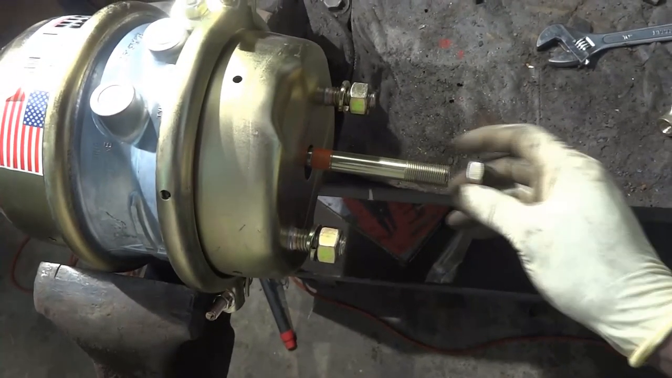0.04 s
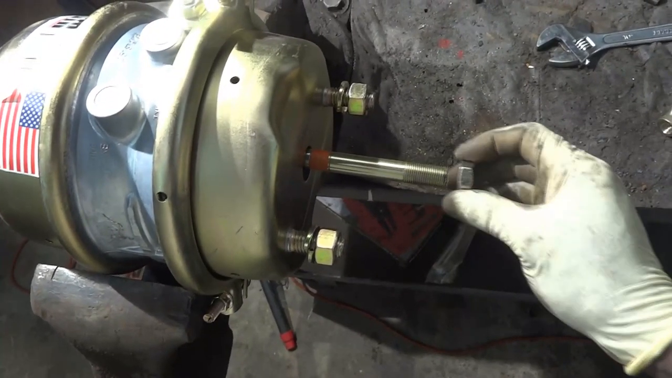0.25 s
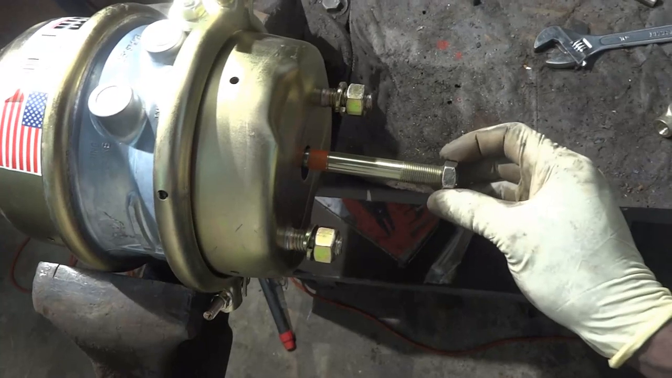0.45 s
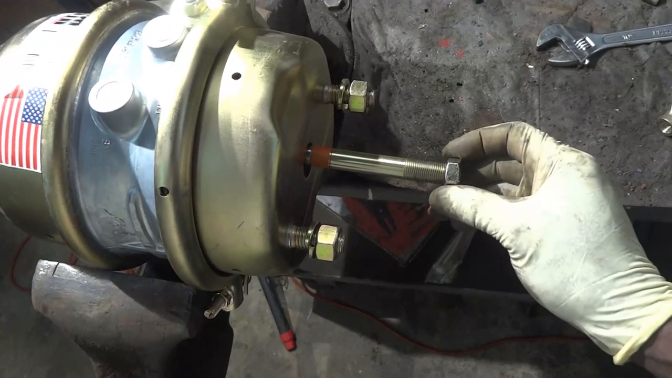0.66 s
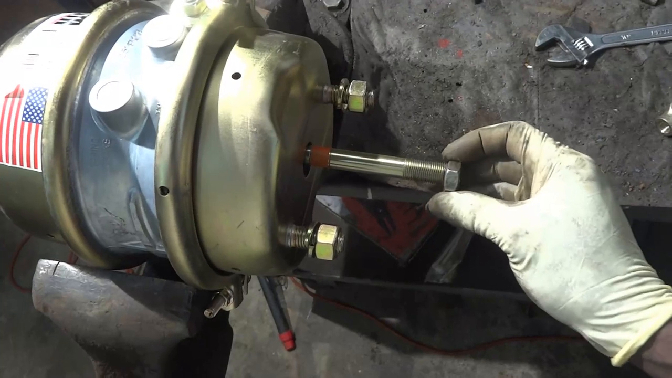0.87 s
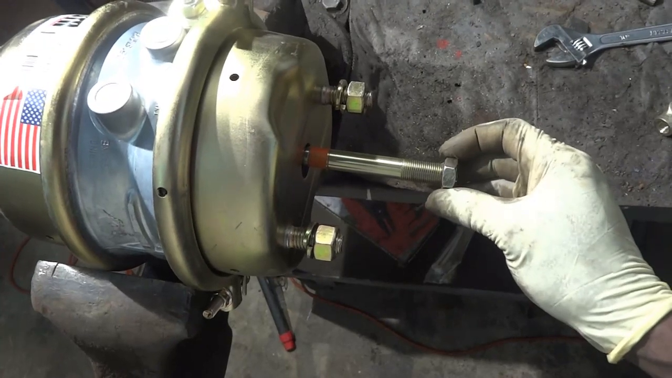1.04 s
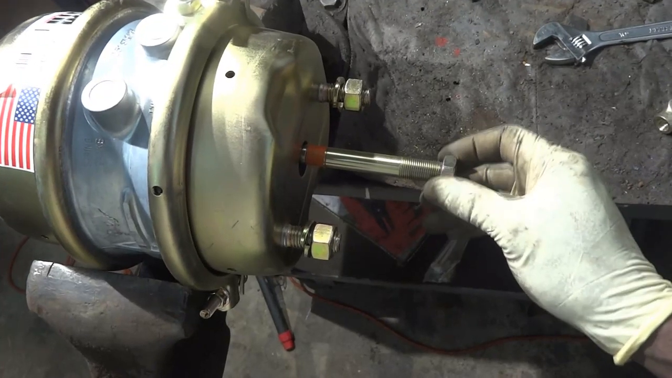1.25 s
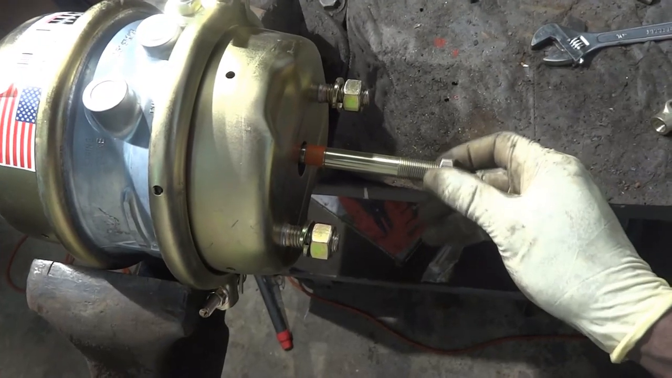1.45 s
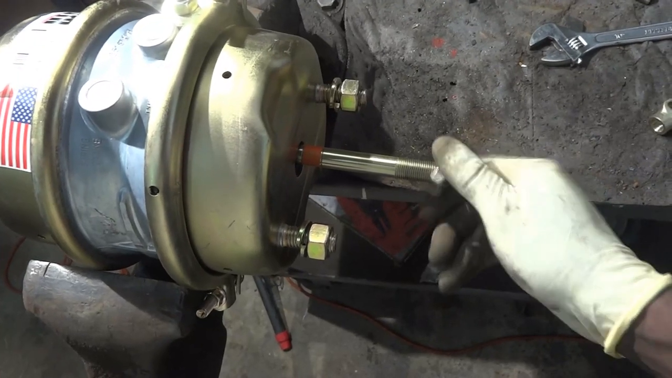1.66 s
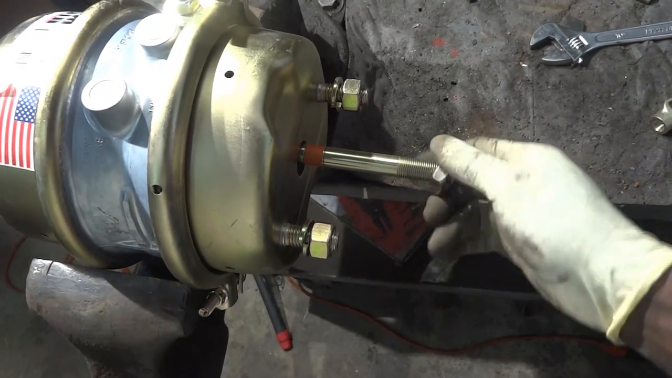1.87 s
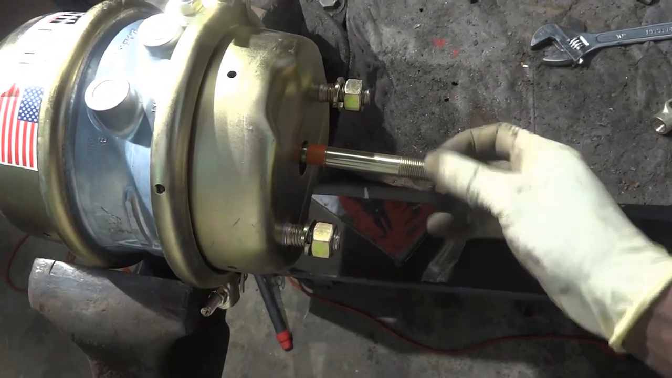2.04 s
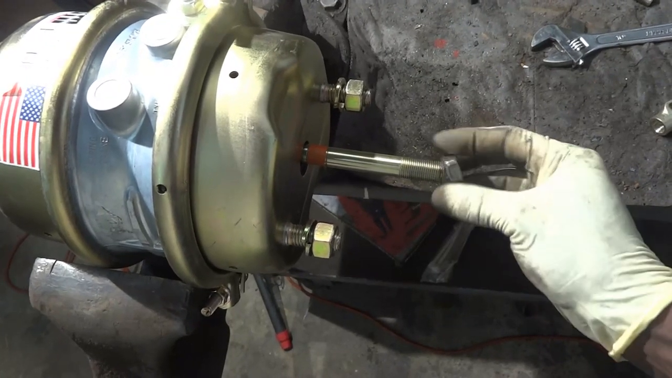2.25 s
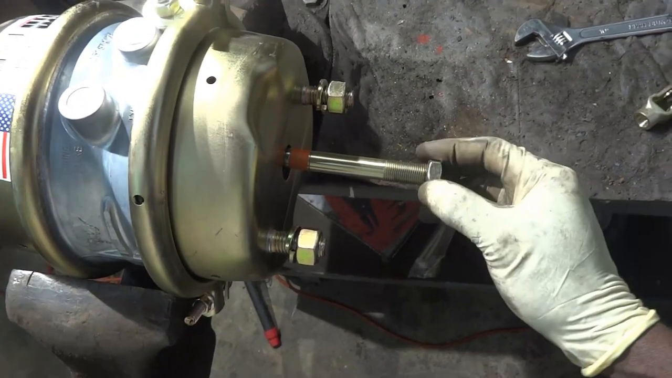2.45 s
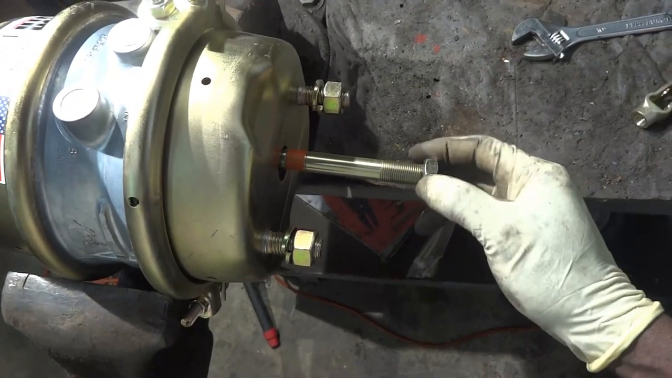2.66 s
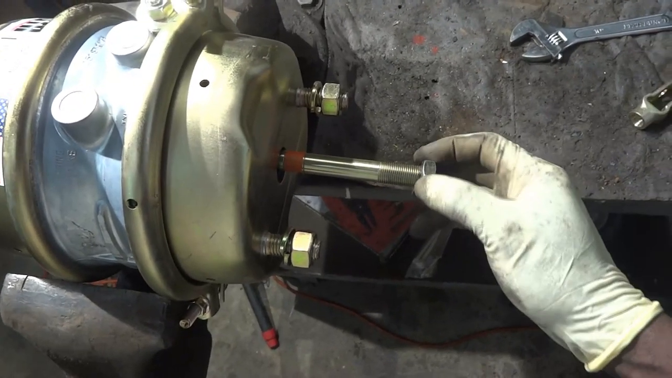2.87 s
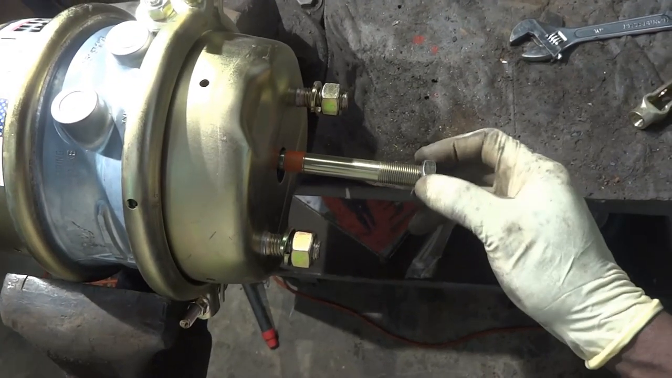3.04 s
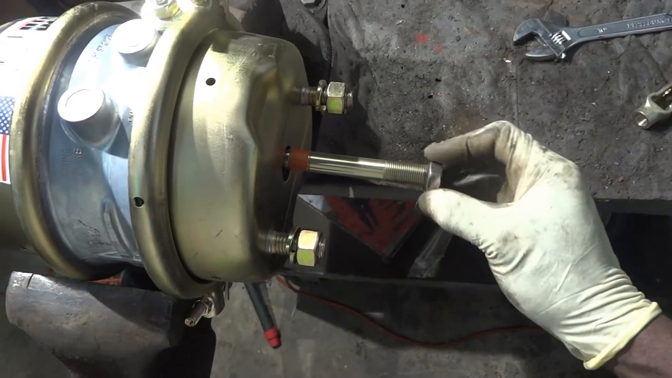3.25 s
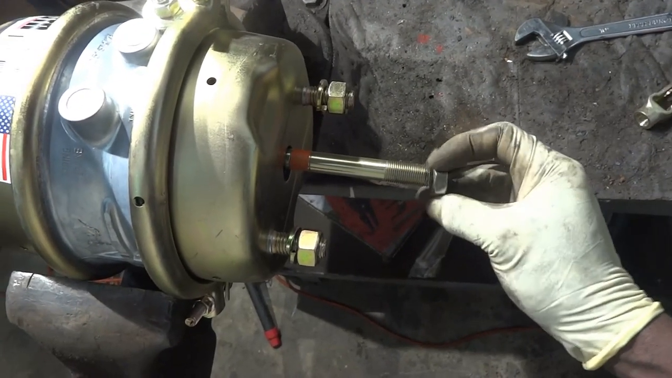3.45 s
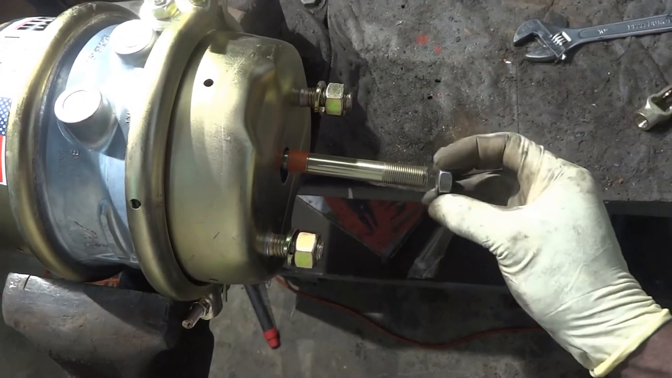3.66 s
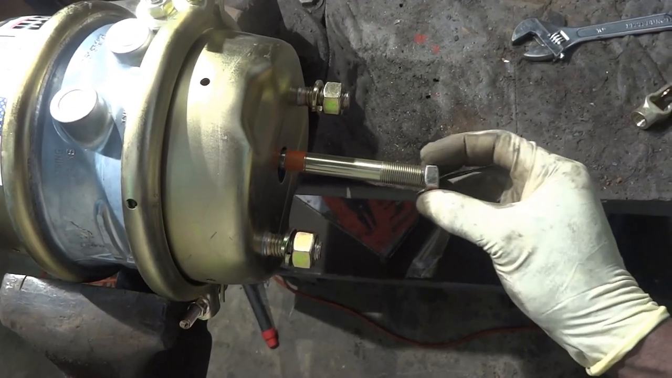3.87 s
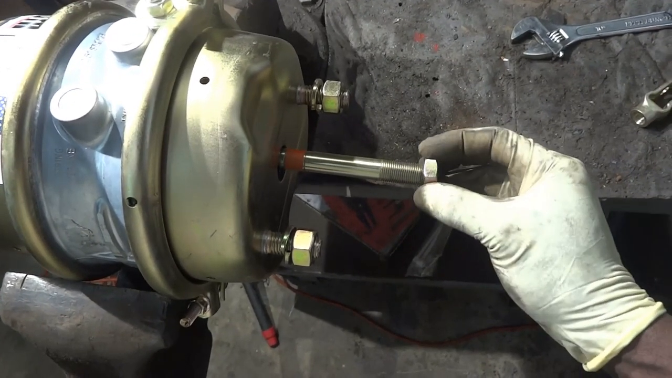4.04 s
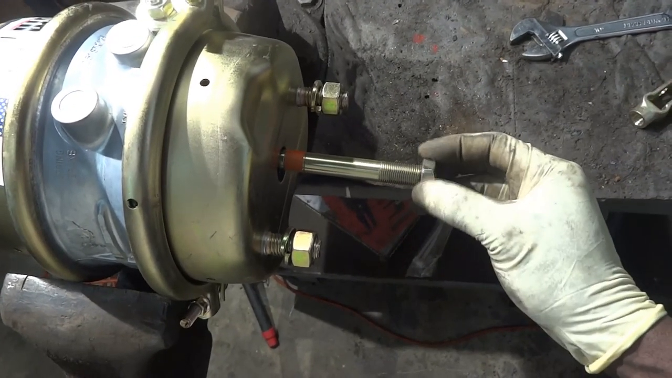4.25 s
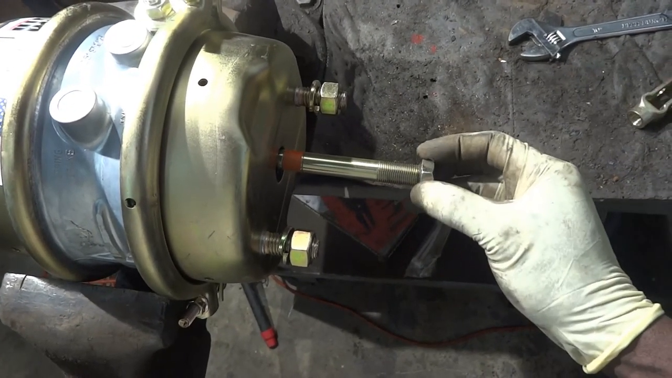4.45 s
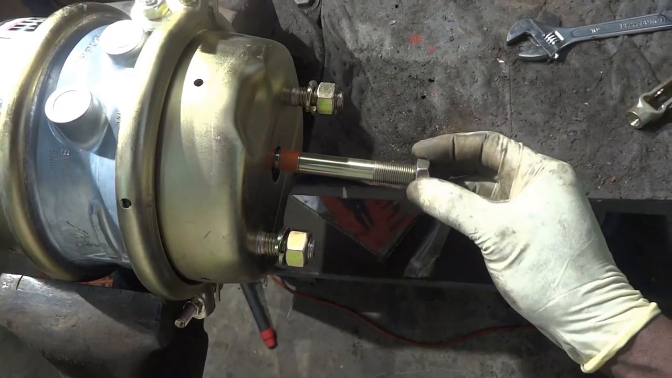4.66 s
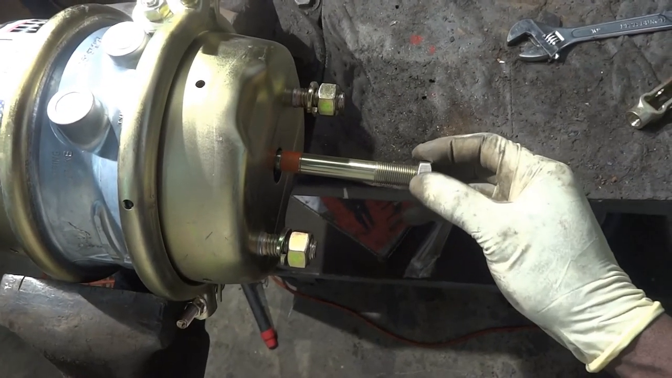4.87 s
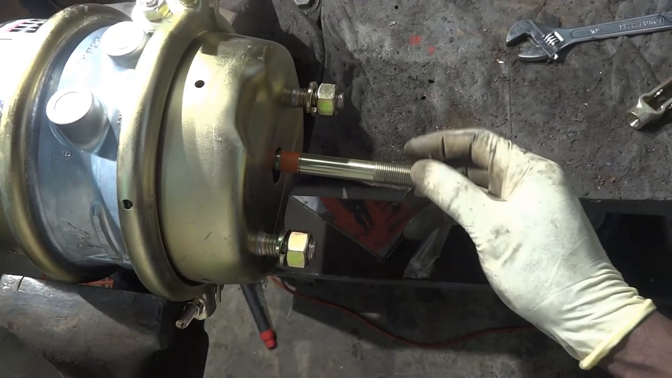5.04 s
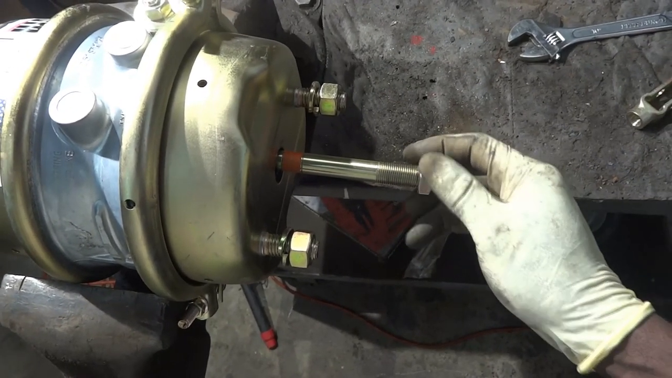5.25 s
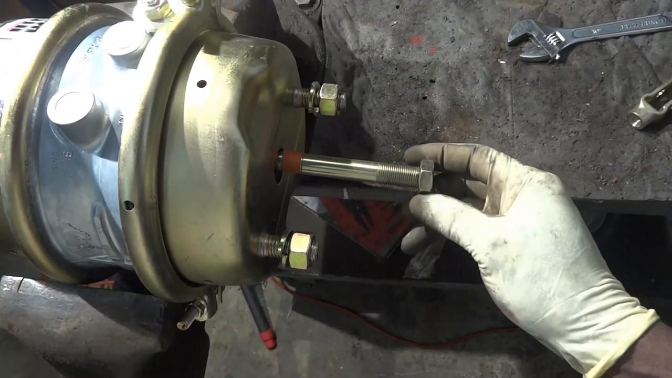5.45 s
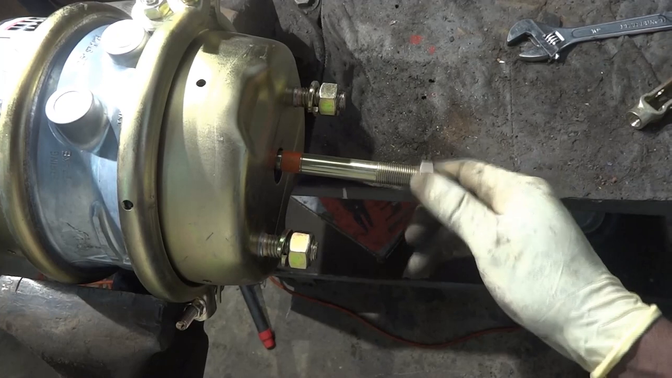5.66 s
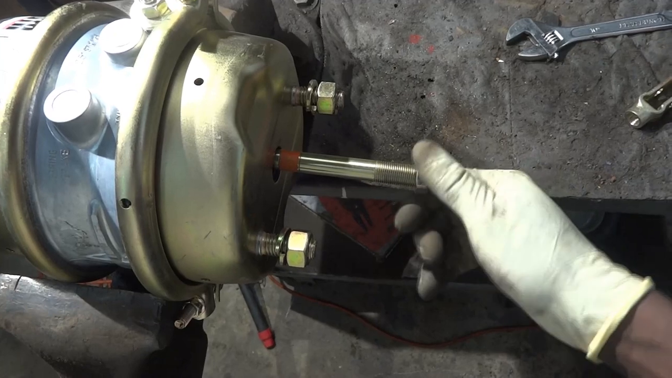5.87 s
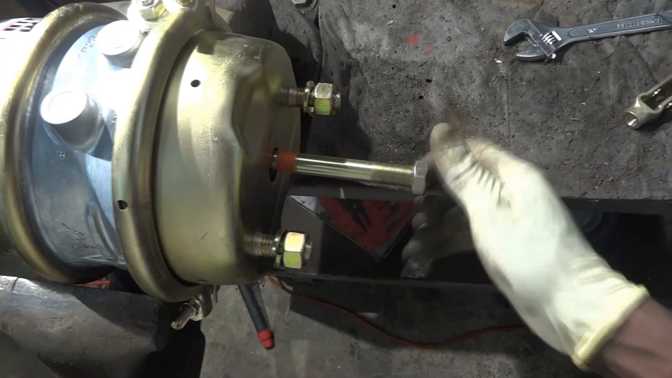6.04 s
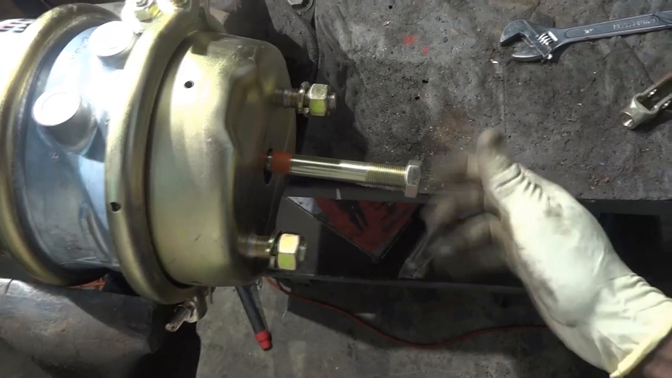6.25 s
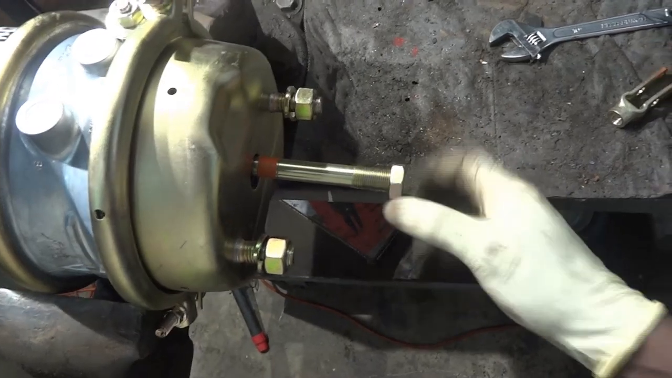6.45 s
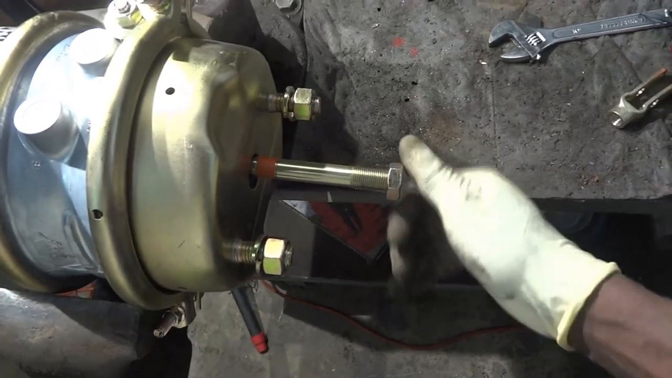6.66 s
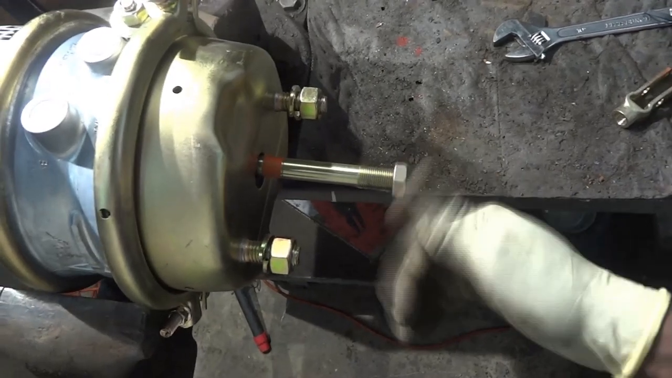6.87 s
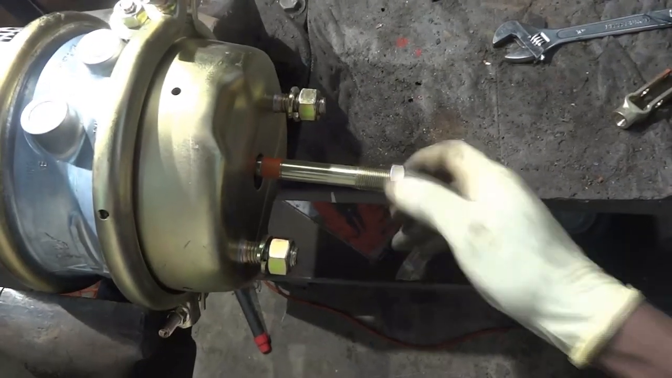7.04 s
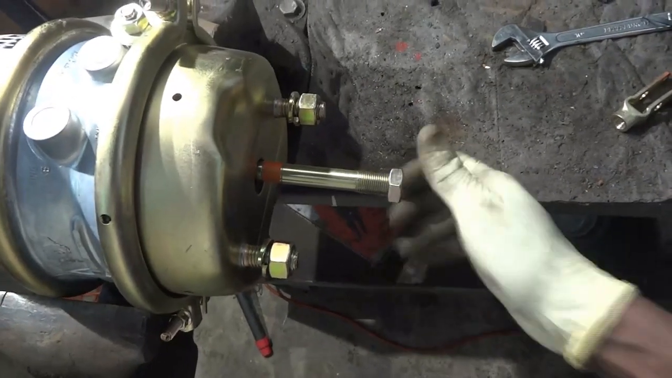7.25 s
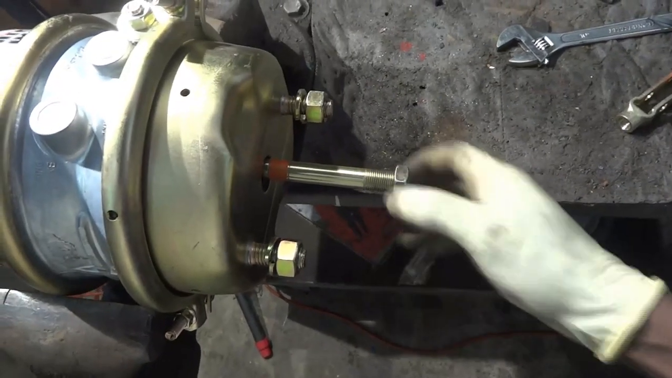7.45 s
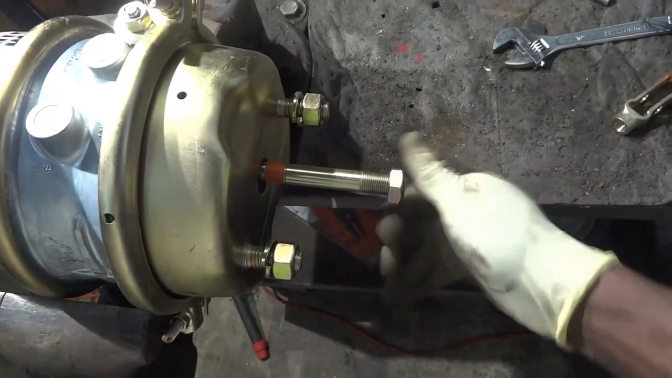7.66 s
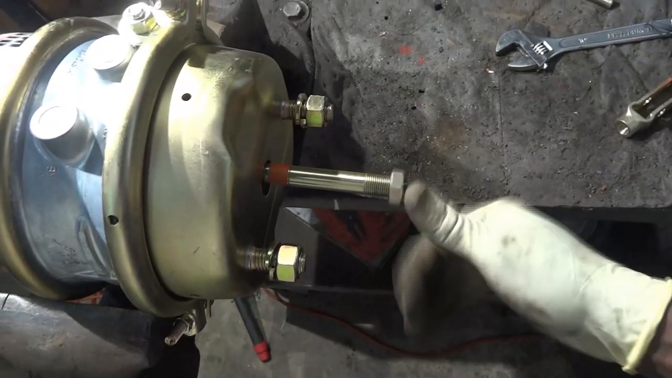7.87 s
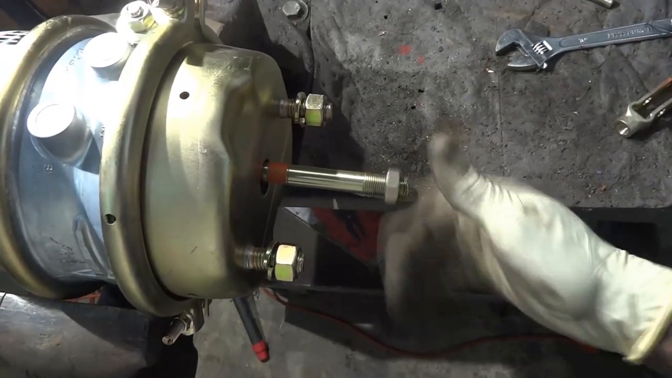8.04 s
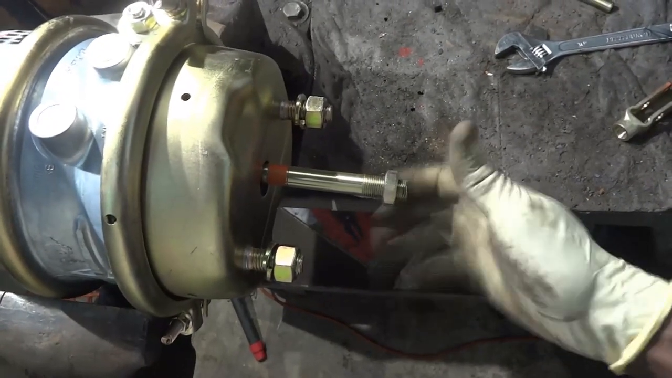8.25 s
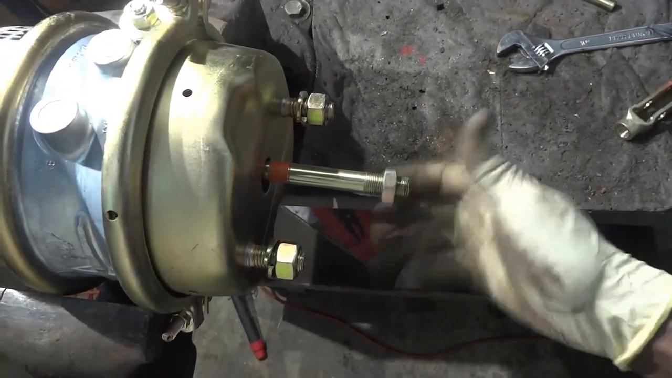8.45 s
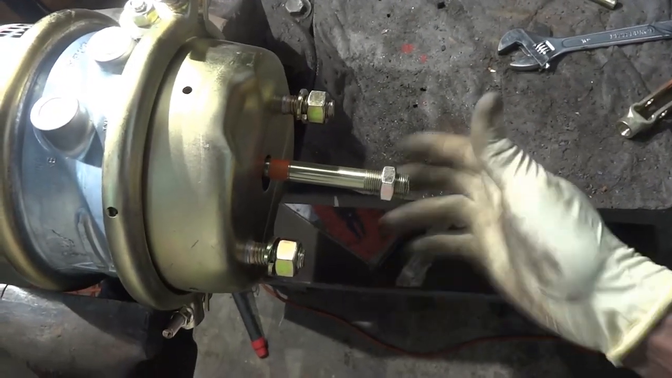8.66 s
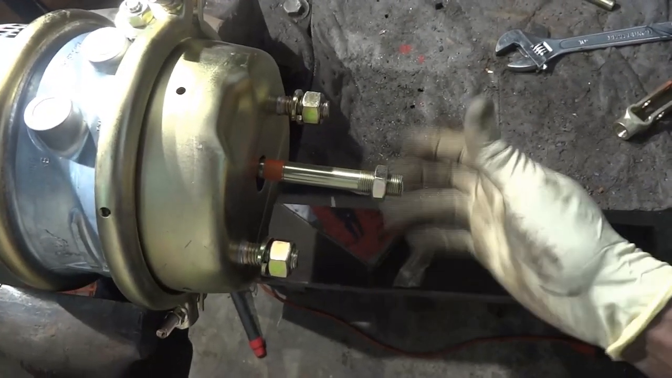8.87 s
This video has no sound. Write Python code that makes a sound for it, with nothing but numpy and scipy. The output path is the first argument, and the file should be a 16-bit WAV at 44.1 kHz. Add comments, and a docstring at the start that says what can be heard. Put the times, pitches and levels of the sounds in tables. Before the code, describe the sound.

A steel nut ticks and scrapes along a threaded rod, then spins with quick metallic rattles, a thin high ring and rubber glove snaps.

```python
"""Small ticks and scrapes, close by: a gloved hand slowly threads a steel nut along the push rod of a
brake chamber clamped in a vice. From about 6 s, finger flicks spin the nut; it rattles on the thread
and rings while it runs free. Every contact excites the modes of the rod and the steel housing.
The rubber glove rustles and snaps. Behind it, a quiet workshop: short reverb, rumble, soft hiss."""
import sys
import numpy as np
from scipy import signal
from scipy.fft import rfft, irfft, next_fast_len
from scipy.io import wavfile
from scipy.ndimage import uniform_filter1d

SR = 44100
rng = np.random.default_rng(int(sys.argv[2]) if len(sys.argv) > 2 else 0)


def persist_wave(psi):
    """Save psi, clipped to +-1, as 16-bit WAV."""
    counts = np.round(np.clip(psi, -1, 1) * 32767).astype(np.int16)
    wavfile.write(sys.argv[1], SR, np.atleast_2d(counts).T)


N = 392486

# Event levels precede the mix gains. Hardness: rod over housing. Clink: boost of housing overtones.
# Nut strikes a thread flank: (time [s], level [dB], hardness [dB], clink [dB])
KNOCKS = [(.384, -44, -6, 9), (.653, -32.5, -10, -2), (.7814, -44, -5, -5), (.8327, -33.5, -14, -2),
          (1.008, -42.5, -8, 3), (1.0838, -39.5, -3, -4), (1.1848, -40.5, -4, -5), (1.2733, -37.5, -12, -2),
          (1.416, -46.5, 4, 0), (1.6144, -36.5, 3.5, 6), (1.8624, -37, -13, -5), (1.909, -29, -13, -3),
          (2.0971, -30, -3, -12), (2.1166, -33, -14, -11), (2.2993, -47, -14, 10), (2.3781, -36, 0, 0),
          (2.443, -42.5, -16, -1), (2.4863, -43, -21, -2), (2.5859, -53, -20, 0), (3.2178, -47, -23, -10),
          (3.328, -45, -3, 5), (3.5385, -43, -3, 9), (3.5556, -36, -4, 12), (3.5937, -46, -3, -9),
          (4.0178, -45, -4, 1), (4.1454, -49, -2, 2), (4.1625, -31.5, -6, 1), (4.2617, -43, -14, 7),
          (4.2873, -41.5, -16, -5), (4.6572, -46, -24, 4), (5.0772, -44.5, -5, 6), (5.4797, -45, -9, 0),
          (5.8389, -47, -15, -11), (6.0764, -35, -1, -1), (6.3348, -48, -3, -9), (6.37, -32, 0, 1),
          (7.521, -54, 4, 7), (7.5682, -30.5, 2, -11), (7.8063, -39, 10, 2), (7.9684, -38, -2, 1),
          (8.0338, -19, 3, -11), (8.2045, -57, 20, -3), (8.2761, -32.5, 8.5, 0), (8.509, -30, 7, -2),
          (8.7415, -34, 9, -9)]
# Nut scrapes on the thread: (peak time [s], mean of 20 dB rise and fall [s], level [dB], hardness [dB])
SCRAPES = [(.5, .06, -58, -8), (.8, .05, -47.5, -20), (.971, .08, -52, -12), (1.24, .04, -48, -16),
           (1.501, .028, -42, -11), (1.575, .026, -39.5, -12), (1.67, .043, -36, -10),
           (1.71, .027, -39, -7), (1.742, .017, -35.5, -11), (1.867, .014, -38, -9),
           (1.93, .018, -38.5, -16), (2.031, .07, -41.5, -15), (2.085, .05, -35.5, -12),
           (2.111, .024, -37, -2), (2.332, .018, -49, 0), (2.355, .015, -43, -18), (3.122, .035, -38, -18),
           (3.44, .025, -48, -20), (3.966, .014, -45, -22), (4.035, .035, -47, -13),
           (4.433, .02, -41.5, -19), (4.93, .08, -51, -22), (5.08, .15, -54, -14), (5.445, .022, -49, -19),
           (5.495, .02, -43.5, -11), (5.71, .056, -40, -16), (6.01, .014, -48, -21), (6.09, .018, -36, -12),
           (6.49, .065, -58, 1), (6.95, .032, -29.5, -2), (7.103, .022, -34.5, -14), (7.152, .045, -39, -8),
           (7.339, .02, -31, -3), (8.068, .022, -35, 12)]
# Fingertips bump the rod in its mount: (peak time [s], level [dB])
THUMPS = [(1.742, -41), (1.92, -44), (2.07, -44), (2.378, -46), (3.154, -43), (3.289, -51), (3.44, -50),
          (4.023, -44), (4.29, -48), (4.93, -52), (5.05, -52), (5.71, -45), (6.345, -42), (6.86, -41),
          (8.345, -39), (8.575, -33), (8.81, -39)]
# Finger spins the nut: (landing [s], slip [s], slip level [dB], hardness [dB], drag level [dB],
# coast level [dB], coast length [s], coast clink [dB])
FLICKS = [(6.085, 6.137, -29, -3, -48, -44, .06, -1), (6.34, 6.385, -28, 2, -40, -42, .04, -1),
          (6.61, 6.66, -36, -3, -53, -53, .05, 0), (6.85, 6.882, -29.5, 4, -47, -32, .085, -1),
          (7.315, 7.369, -31, 2, -44, -37.5, .13, 5), (7.57, 7.599, -34, -10, -43, -42, .1, -1),
          (7.808, 7.854, -30, 4, -44, -38, .17, 7), (8.036, 8.11, -26, 1.5, -30, -42, .09, -6),
          (8.278, 8.338, -26, 5, -39, -40, .1, -4), (8.511, 8.567, -24, 5, -39, -41, .12, -5),
          (8.744, 8.81, -25.5, 7, -38, -41, .1, -5)]
# Nut rings free: (start [s], caught [s], level [dB], decay [dB/s])
FREE_RINGS = [(2.325, 2.38, -70, 40), (3.555, 3.85, -75, 36), (6.085, 6.128, -52, 10),
              (6.125, 6.185, -45, 50), (6.37, 6.397, -33.5, 10), (6.888, 6.982, -42, 3),
              (7.365, 7.516, -38.5, 119), (7.855, 8.032, -41.5, 108), (8.044, 8.191, -16.5, 46.5),
              (8.288, 8.454, -32.5, 19), (8.515, 8.562, -35, 10)]
# Modes of rod and housing: (frequency [Hz], energy [dB], T60 [s])
STEEL_MODES = [(108.7, -18, 0.25), (128.6, -17, 0.7), (211, -6.5, 0.22), (223.8, -11.5, 0.16),
               (272.2, -17, 0.5), (339, -8, .2), (513.5, -23, 0.16), (811.5, -11, 0.068),
               (847.5, -3.5, 0.081), (879.2, -3, 0.079), (908, -0.5, 0.11), (927.5, -7, 0.14),
               (971, -7, .13), (1039.5, -11.5, 0.11), (1053.4, -10, 0.18), (1740, -15.5, 0.18),
               (1930, -7.5, .11), (2008, -4.5, 0.09), (2046.6, -4.5, 0.1), (2087, -5.5, 0.072),
               (2256, -14, 0.12), (3316, -14, 0.019), (3734, -13, 0.079), (4005, -3, 0.039),
               (4132, -5, 0.034), (4984, -14, 0.016), (6590, -12, 0.064), (7707, -8, 0.077),
               (9020, -23.5, 0.055), (11420, -6, 0.036), (11410, -4.5, 0.023)]
# Dense, quickly damped modes between them: (frequency [Hz], relative density [dB])
CRACK_SPECTRUM = [(60, -30), (140, -3), (220, 2), (380, 0), (600, -11), (800, -13), (1250, -27),
                  (1500, -20), (2100, 8), (2700, 5), (3800, 15), (5200, 13.5), (7500, 6.5), (10000, -9),
                  (12000, -10), (16000, -5)]
# Bounds of the five bands mount, housing, overtones, rod, top: (edge [Hz])
BAND_EDGES_HZ = [70, 550, 1400, 2800, 9500, 17000]
# Thump in each band: (offset [dB])
THUMP_BANDS_DB = [0, -20, -20, -28, -38]
# Glove slides on steel: (centre time [s], 1/e half width [s], level [dB])
GLOVE_RUBS = [(0.243, 0.074, -68.5), (1.872, 0.036, -56.5), (2.163, 0.045, -66), (2.75, 0.054, -71),
              (5.027, 0.11, -69), (5.777, 0.066, -65), (5.93, 0.059, -63.5), (6.075, 0.023, -61),
              (6.138, .02, -51), (6.24, 0.085, -63), (6.372, .03, -42), (6.49, .05, -58),
              (6.604, 0.015, -55), (6.84, 0.012, -52.5), (6.882, .017, -42), (7.31, 0.029, -57),
              (7.355, .022, -43), (7.702, 0.054, -59), (8.064, .015, -32), (8.23, 0.03, -66)]
# Rubber snaps off an edge: (time [s], peak level [dB])
GLOVE_SNAPS = [(6.363, -23), (6.411, -28), (6.502, -38), (6.516, -36), (6.59, -42), (7.003, -33),
               (7.142, -34), (7.3455, -12.5), (7.856, -11), (8.3164, -19), (8.779, -21)]
# Rubber friction: (frequency [Hz], relative density [dB])
GLOVE_SPECTRUM = [(80, -45), (400, -22), (1500, -9), (4000, 4), (9000, 3), (13000, 4), (16000, -2.5)]
# Workshop reverb, mid and side: (frequency [Hz], relative density [dB])
REVERB_MID = [(80, -10.5), (250, 3), (900, -1.5), (2000, -2), (4000, -5), (8000, -6.5), (11500, -14),
              (16000, -6)]
REVERB_SIDE = [(80, -14), (200, 0), (350, 2), (600, -4), (900, 0), (2000, -4), (4000, -9), (8000, -10),
               (11500, -17), (16000, -8)]
# Workshop background, mid and side: (frequency [Hz], relative density [dB])
AIR_MID = [(12, -50), (20, -12), (59, -2.5), (232, -3.5), (282, -2.5), (333, -8), (439, -2.5), (505, -10.5),
           (705, -9.5), (932, -13.5), (2210, -17), (2610, -18), (3960, -19.5), (4550, -20), (15500, -25.5)]
AIR_SIDE = [(12, -68), (20, -29), (59, -17), (110, -12), (200, -7), (380, -7), (700, -8), (1290, -13),
            (2380, -19), (4400, -25), (8120, -37), (15000, -48)]

SIDE_SIGNS = np.array([[1], [-1]])  # left, right


def nut_handled(filters, knock_gain_db=-3.1, scrape_gain_db=-.8, thump_gain_db=-1.5, rise_share=.46):
    """Nut knocks and scrapes on the thread, in slow turns and around flicks; fingertips bump the rod."""
    out = np.zeros(N)
    for start_s, db, hardness_db, clink_db in KNOCKS:
        tick = struck_steel(knock(), band_levels(db, hardness_db, clink_db), filters)
        add(out, start_s, undb(knock_gain_db) * tick)
    for peak_s, width_s, db, hardness_db in SCRAPES:
        start_s, swell = volley(peak_s, 2 * width_s * rise_share, 2 * width_s * (1 - rise_share))
        scrape = struck_steel(chatter(swell), band_levels(db, hardness_db), filters)
        add(out, start_s, undb(scrape_gain_db) * scrape)
    for peak_s, db in THUMPS:
        start_s, swell = volley(peak_s, rise_s=.025, fall_s=.032)
        thump = struck_steel(chatter(swell), db + np.array(THUMP_BANDS_DB), filters)
        add(out, start_s, undb(thump_gain_db) * thump)
    return out


def nut_flicked(filters, gain_db=-.8, shake_db=4.5, growth_db_per_s=45, decay_db_per_s=95):
    """Flicks: a growing rattle under the finger, a burst as it slips, a fading whirr as the nut coasts."""
    out = np.zeros(N)
    for land_s, slip_s, slip_db, hardness_db, drag_db, coast_db, coast_s, clink_db in FLICKS:
        swell = undb(-growth_db_per_s * seconds(slip_s - land_s))[::-1]
        drag = chatter(swell, hits_per_s=600, friction=.035)
        levels_db = band_levels(drag_db, hardness_db - 2.5, shake_db=shake_db)
        add(out, land_s, struck_steel(drag, levels_db, filters))

        start_s, swell = volley(slip_s, rise_s=.026, fall_s=.04)
        slip = chatter(swell, hits_per_s=700, friction=.04)
        levels_db = band_levels(slip_db, hardness_db, shake_db=shake_db)
        add(out, start_s, struck_steel(slip, levels_db, filters))

        coast = chatter(undb(-decay_db_per_s * seconds(coast_s)), hits_per_s=700, friction=.035)
        levels_db = band_levels(coast_db, hardness_db - 4, clink_db, shake_db)
        add(out, slip_s, struck_steel(coast, levels_db, filters, soft_crack_db=-11))
    return undb(gain_db) * out


def knock(rebound=.58, flight_s=.002, count=4):
    """Force of one contact, then weaker bounces in the play of the thread."""
    flights_s = flight_s * (.5 + rng.random(count))
    hit_samples = (SR * (np.cumsum(flights_s) - flights_s[0])).astype(int)
    force = np.zeros(hit_samples[-1] + 1)
    force[hit_samples] = rebound ** np.arange(count)
    return force


def chatter(swell, hits_per_s=850, scatter_db=4.0, friction=.048, crest=1.94):
    """Force of the loose nut: random hits on the thread flanks over light scraping."""
    size = len(swell)
    hits = (rng.random(size) < hits_per_s / SR) * rng.choice([-1, 1], size)
    strengths = undb(scatter_db * np.clip(rng.standard_normal(size), -2, 2))
    force = swell * (hits * strengths + friction * rng.standard_normal(size))
    force[np.argmax(swell)] = crest  # one hard hit at the peak
    return force


def volley(peak_s, rise_s, fall_s, build_s=.003):
    """Start and swell of a run of hits, 20 dB per rise or fall; early, as the ring takes time to build."""
    lead_s = 1.5 * rise_s
    t = seconds(1.5 * (rise_s + fall_s)) - lead_s
    return peak_s - lead_s - build_s, undb(-20 * np.maximum(-t / rise_s, t / fall_s))


def band_levels(housing_db, hardness_db, clink_db=0, shake_db=0, gentle_db=-40):
    """Levels of the five bands for one contact; the top grows fastest with force."""
    housing_drive_db = housing_db - gentle_db
    rod_drive_db = housing_drive_db + hardness_db
    mount_db = -53.5 + .85 * housing_drive_db + shake_db
    overtones_db = -42 + .69 * (housing_drive_db + rod_drive_db) / 2 + clink_db
    top_db = -53 + 1.56 * rod_drive_db
    return [mount_db, housing_db, overtones_db, housing_db + hardness_db, top_db]


def struck_steel(force, levels_db, filters, soft_crack_db=-8, soft_hz=4000, hard_hz=15000):
    """Contact force rings the steel; grip and contact point set the level of each band."""
    rod_db = levels_db[-2]
    hard_db, range_db = -22, 14.5
    softness = np.clip((hard_db - rod_db) / range_db, 0, 1)
    # A gentle contact pushes for longer: duller, less crack.
    cutoff_hz = hard_hz * (soft_hz / hard_hz) ** softness
    ring = signal.fftconvolve(force, steel_response(crack_db=-1.5 + soft_crack_db * softness))
    ring = signal.lfilter(*signal.butter(2, cutoff_hz, fs=SR), ring)
    out = 0
    for sos, db in zip(filters, levels_db):
        band = signal.sosfilt(sos, ring)
        peak_rms = np.sqrt(uniform_filter1d(band ** 2, size=353).max())  # 8 ms window
        out = out + undb(db) * band / peak_rms
    return out


def steel_response(crack_db, crack_t60_s=.04, spread_db=1.0, detune=.0025):
    """Impulse response of rod and housing; each spot on the thread weights the modes anew."""
    t = seconds(.25)
    out = undb(crack_db) * unit_energy(noise(CRACK_SPECTRUM, len(t)) * fade(t, crack_t60_s))
    for hz, db, t60_s in STEEL_MODES:
        weight, shift, polarity = rng.standard_normal(3)
        age_s = t[:int(t60_s * SR)]
        mode = np.sin(2 * np.pi * hz * (1 + detune * shift) * age_s) * fade(age_s, t60_s)
        out[:len(mode)] += np.sign(polarity) * undb(db + spread_db * weight) * unit_energy(mode)
    return out


def nut_ringing(hz=7163, build_s=.0045, caught_t60_s=.064, jostle_depth=.58, settle_s=.11):
    """The free nut sings one high note, jostled by the thread at first, until a touch damps it."""
    out = np.zeros(N)
    for start_s, caught_s, db, decay_db_per_s in FREE_RINGS:
        free_s = caught_s - start_s
        t = seconds(free_s + .15)
        damping = fade(np.maximum(t - free_s, 0), caught_t60_s)
        envelope = (1 - np.exp(-t / build_s)) * undb(db - decay_db_per_s * t) * damping
        jitter = wander(176, len(t)) + 1j * wander(167, len(t))  # amplitude and phase
        jostle = 1 + jostle_depth * np.exp(-t / settle_s) * jitter
        tone = np.imag(jostle * np.exp(2j * np.pi * hz * t))
        add(out, start_s, np.sqrt(2) * envelope * tone)
    return out


def glove(rub_gain_db=2.0, grain_db=2.5, grain_hz=810, snap_t60_s=.006):
    """Rubber slides over steel with a grainy hiss and snaps off edges."""
    swell = np.zeros(N)
    for centre_s, half_s, db in GLOVE_RUBS:
        t = seconds(4 * half_s) - 2 * half_s
        add(swell, centre_s - 2 * half_s, undb(db + rub_gain_db) * np.exp(-(t / half_s) ** 2))
    out = swell * noise(GLOVE_SPECTRUM, N) * undb(grain_db * wander(grain_hz, N))
    t = seconds(.02)
    for start_s, db in GLOVE_SNAPS:
        snap = noise(GLOVE_SPECTRUM, len(t)) * fade(t, snap_t60_s)
        add(out, start_s, undb(db) * snap / np.abs(snap).max())
    return out


def workshop_reverb(x, mid_db=-16.5, side_db=-21, t60_s=.5, predelay_s=.0034):
    """Bench and walls return a short tail, partly different at each ear."""
    t = seconds(.7)
    tail = fade(t, t60_s) * (t > predelay_s)
    mid = signal.fftconvolve(x, unit_energy(noise(REVERB_MID, len(t)) * tail))[:N]
    side = signal.fftconvolve(x, unit_energy(noise(REVERB_SIDE, len(t)) * tail))[:N]
    return undb(mid_db) * mid + undb(side_db) * side * SIDE_SIGNS


def room_air(mid_db=-59.5, side_db=-62):
    """Steady rumble and soft hiss; the midrange comes from all around."""
    return undb(mid_db) * noise(AIR_MID, N) + undb(side_db) * noise(AIR_SIDE, N) * SIDE_SIGNS


def undb(db):
    return 10 ** (np.asarray(db) / 20)


def unit_energy(x):
    return x / np.sqrt(np.sum(x ** 2))


def seconds(length_s):
    return np.arange(int(length_s * SR)) / SR


def fade(t, t60_s):
    return np.exp(-np.log(1000) * t / t60_s)


def add(track, start_s, x):
    i = max(int(start_s * SR), 0)
    track[i:i + len(x)] += x[:max(N - i, 0)]


def noise(spectrum, size):
    """Unit-rms noise shaped by (frequency [Hz], relative density [dB]) points."""
    hz, db = np.transpose(spectrum)
    padded = next_fast_len(size, real=True)
    bins_hz = np.maximum(np.fft.rfftfreq(padded, 1 / SR), 1)
    gains = undb(np.interp(np.log(bins_hz), np.log(hz), db))
    x = irfft(rfft(rng.standard_normal(padded)) * gains, padded)[:size]
    return x / x.std()


def wander(rate_hz, size):
    """Random values joined by straight lines."""
    position = np.arange(size) * rate_hz / SR
    count = int(position[-1]) + 2
    return np.interp(position, np.arange(count), rng.standard_normal(count))


def scene(pan_db=.2, ring_send_db=-3, width_db=-14.5, width_hz=12500):
    """Close work, just left of centre; the top treble reaches the ears out of step."""
    filters = [signal.butter(4, edges_hz, "band", fs=SR, output="sos")
               for edges_hz in zip(BAND_EDGES_HZ, BAND_EDGES_HZ[1:])]
    contacts = nut_handled(filters) + nut_flicked(filters) + glove()
    ring = nut_ringing()
    direct = (contacts + ring) * undb([[pan_db], [-pan_db]])
    treble = signal.lfilter(*signal.butter(2, width_hz, "high", fs=SR), contacts)
    reverb = workshop_reverb(contacts + undb(ring_send_db) * ring)
    return direct + undb(width_db) * treble * SIDE_SIGNS + reverb + room_air()


def record(dry):
    """Steep low-pass."""
    cutoff_hz = 15750
    return signal.sosfilt(signal.ellip(10, .2, 80, cutoff_hz, fs=SR, output="sos"), dry)


dry = scene()
out = record(dry)
persist_wave(out)
```